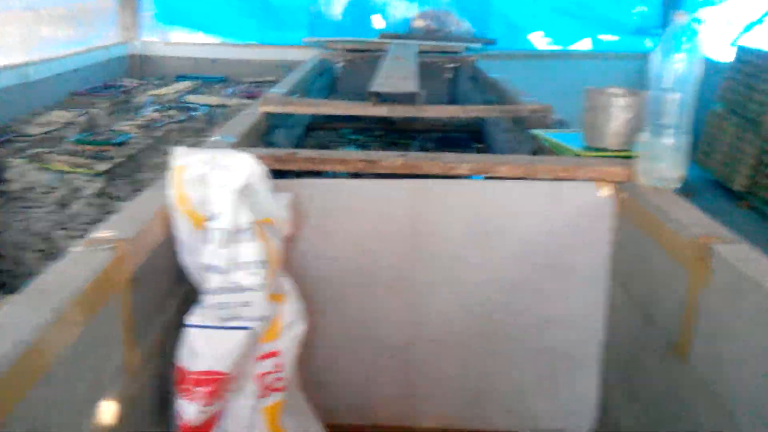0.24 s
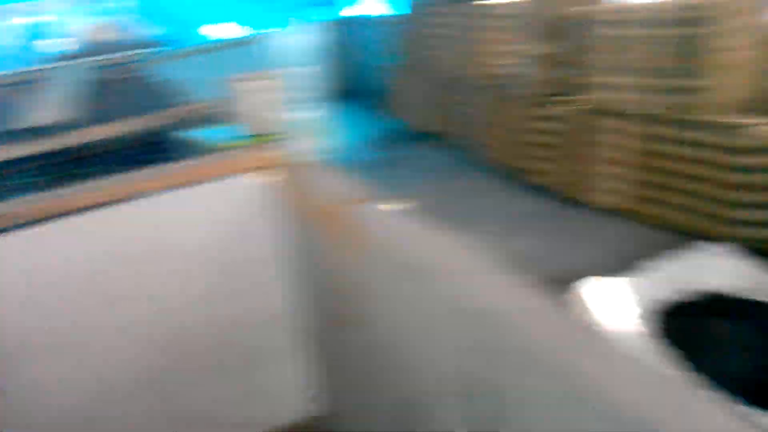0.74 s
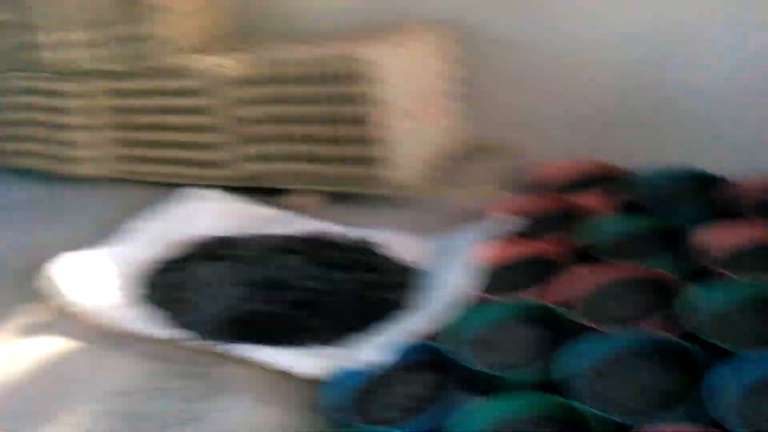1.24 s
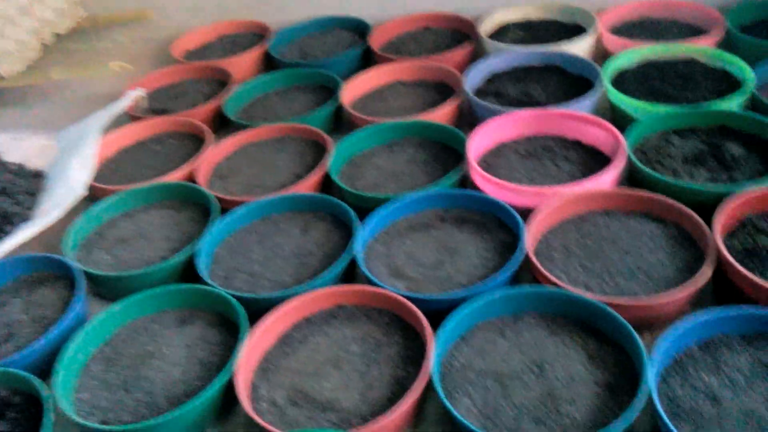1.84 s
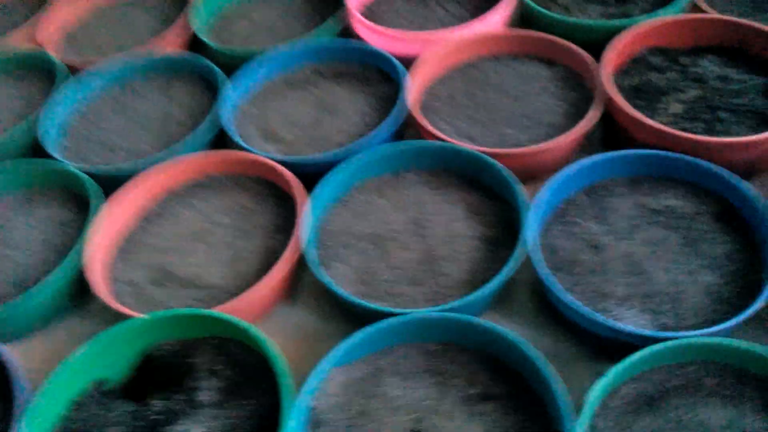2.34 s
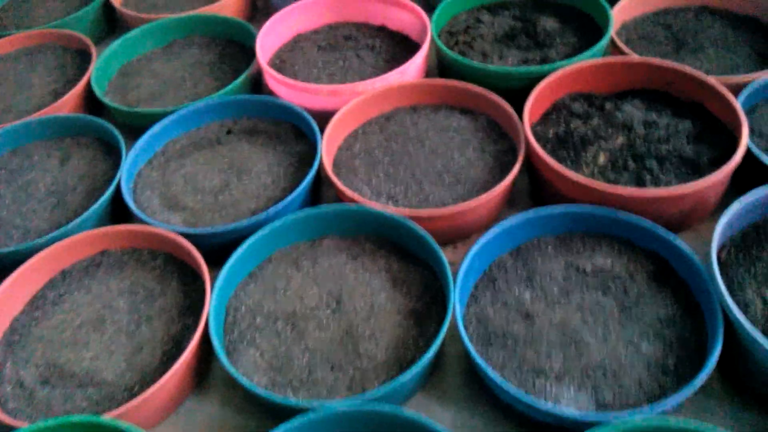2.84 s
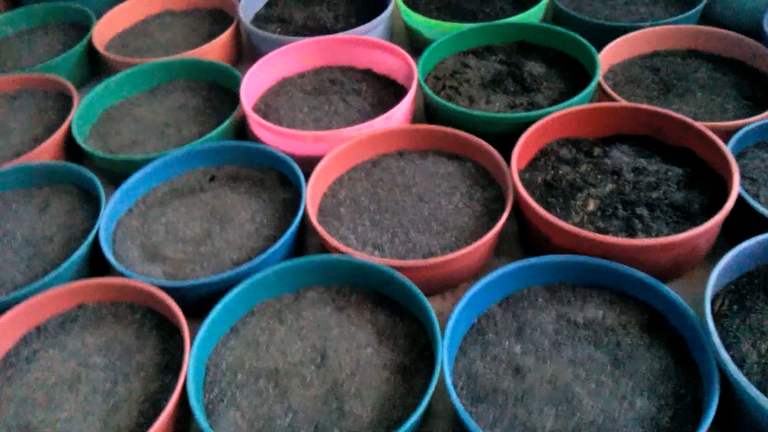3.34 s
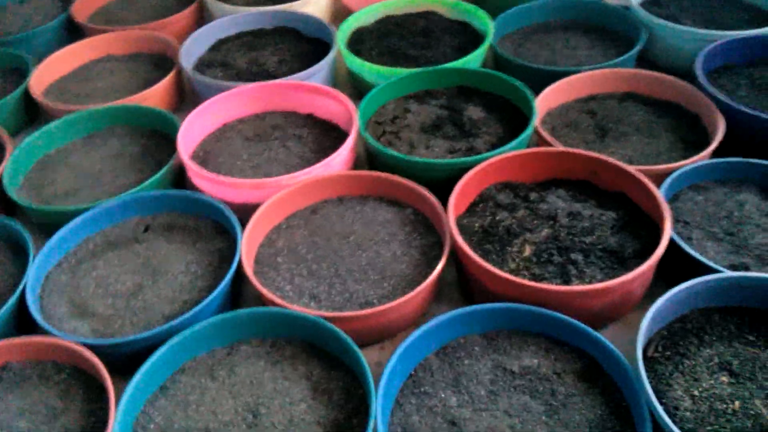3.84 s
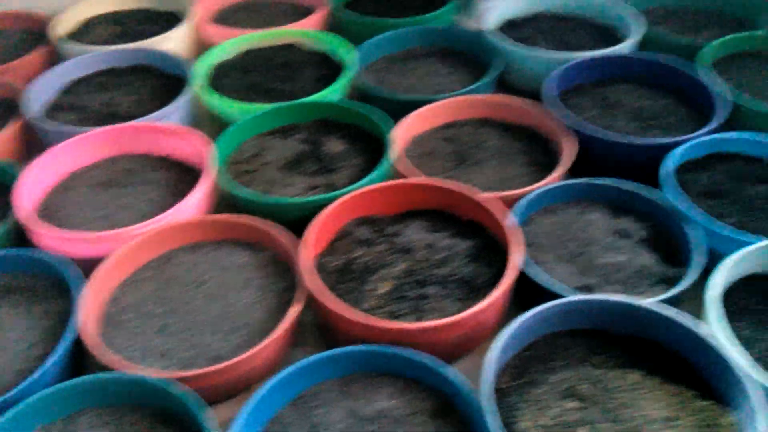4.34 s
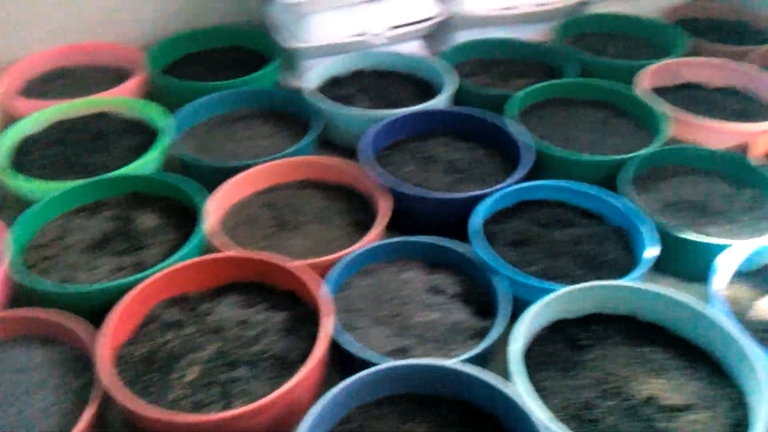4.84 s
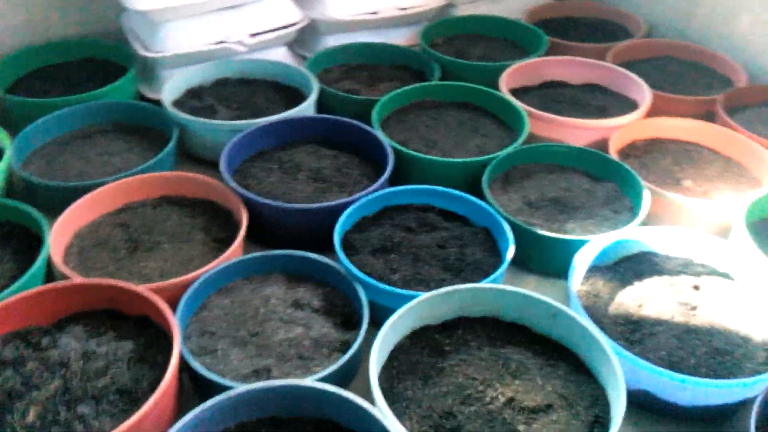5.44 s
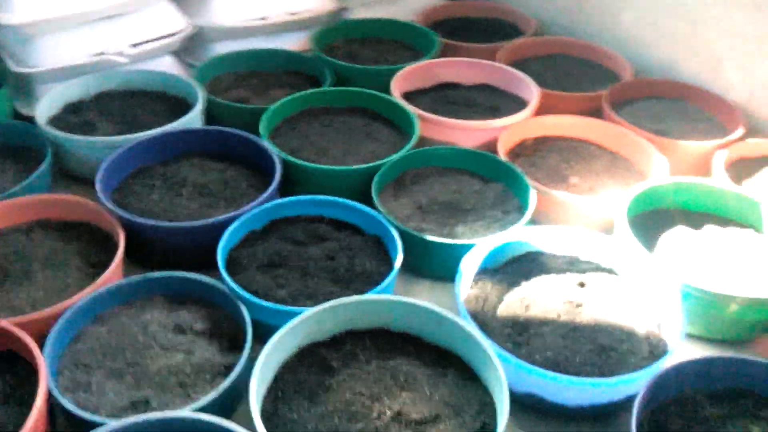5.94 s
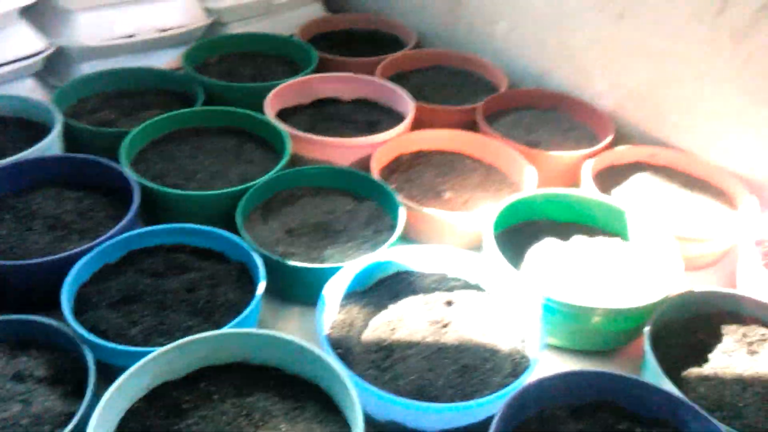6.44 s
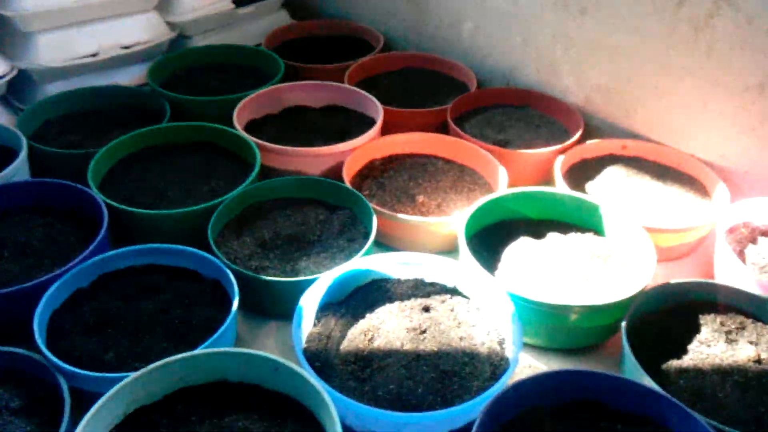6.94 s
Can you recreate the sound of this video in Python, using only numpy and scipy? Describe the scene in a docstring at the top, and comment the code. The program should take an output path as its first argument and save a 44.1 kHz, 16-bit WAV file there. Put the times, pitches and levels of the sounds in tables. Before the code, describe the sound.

Inside a bare-walled farm shed, one close cricket gives clear three-stroke chirps about three and a half times a second. Neighbours chirp unevenly beside it during the first four seconds, and a scratchy colony shimmers behind. A few knocks and rustles come in the first second, later faint rustles and two pairs of tiny squeaks. Soft low rumble and hiss lie beneath. A moving hand-held phone shifts the stereo balance.

```python
"""A farm shed with crickets in rearing pens, heard through a hand-held phone that moves about.
Damped tone pulses make the wing strokes: one near cricket chirps in threes, two neighbours chirp
beside it and a colony shimmers behind; noise-burst echoes from bare walls smear each stroke.
Filtered noise and sine hums lie under it as rumble and air. Noise bursts with ringing modes make
a few knocks, grainy noise makes rustles, and quick falling tones make four faint squeaks."""
import sys
import numpy as np
from scipy import signal
from scipy.fft import rfft, irfft
from scipy.io import wavfile

SR = 44100
rng = np.random.default_rng(int(sys.argv[2]) if len(sys.argv) > 2 else 0)


def store_pcm(level_fs):
    """Save levels as 16-bit WAV."""
    pcm = np.round(np.clip(level_fs, -1, 1) * 32767).astype(np.int16)
    wavfile.write(sys.argv[1], SR, np.atleast_2d(pcm).T)


N = 317520


def undb(db):
    """Decibels to gain."""
    return 10 ** (np.asarray(db) / 20)


def unit(x):
    """Scale to rms 1."""
    return x / np.sqrt(np.mean(x ** 2) + 1e-20)


def pan(db):
    """Left and right gains for a left-minus-right level in dB, at constant total power."""
    return undb(np.array([[db], [-db]]) / 2) / np.sqrt(np.cosh(db * np.log(10) / 20))


def add(out, s, x):
    """Mix x into out from time s on, dropping what falls outside."""
    i = int(round(s * SR))
    a, b = max(i, 0), min(i + x.shape[-1], N)
    if b > a:
        out[:, a:b] += x[..., a - i:b - i]


def shaped(x, gain):
    """Filter x by a gain given as a function of frequency."""
    length = x.shape[-1]
    hz = np.arange(length // 2 + 1) * SR / length + 0.0011  # the offset keeps 0 Hz out of the logs
    return irfft(rfft(x) * gain(hz), length)


def colour(x, points):
    """Filter x by (f/Hz, level/dB) points, joined on a log frequency axis."""
    hz, db = np.transpose(points)
    return shaped(x, lambda f: undb(np.interp(np.log(f), np.log(hz), db)))


def band(length, hz, width):
    """Noise of rms 1 in one steep-sided resonance."""
    noise = rng.standard_normal(length)
    return unit(shaped(noise, lambda f: 1 / np.sqrt(1 + (2 * (f - hz) / width) ** 4)))


def walk(rate):
    """Random drift through `rate` new values a second, with a spread of about 0.6."""
    knots = rng.standard_normal(1000)
    return 0.77 * np.interp(np.arange(N) / SR * rate, np.arange(len(knots)), knots)


def shed(x, t60_s=0.2, early_db=3, early_s=0.0062, gap_s=0.0073):
    """Wall echoes at one spot: early burst, then diffuse tail, unrelated in the two channels."""
    t = np.arange(SR // 2) / SR
    tail = undb(-60 * t / t60_s)
    early = undb(early_db) * np.exp(-t / early_s)
    fade = (tail + early) * np.clip(t / gap_s - .5, 0, 1)
    echoes = rng.standard_normal((2, len(t))) * fade / np.sqrt(np.sum(fade ** 2))
    return signal.fftconvolve(np.atleast_2d(x), echoes, axes=1)


# stereo width of the background: f/Hz, side minus mid level/dB
SIDE_LEVEL = [(60, -23.5), (250, -16), (600, -7.5), (1400, -11), (3000, -6), (12000, 6)]


def background(points, db, pan_db, low_hz, flicker_db=.35):
    """Diffuse noise, alike in both channels in the bass and wide in the treble; its level flickers."""
    mid, side = colour(rng.standard_normal((2, N)), points)
    both = unit(mid) + colour(unit(side), SIDE_LEVEL) * np.array([[1], [-1]])
    both = shaped(both, lambda f: 1 / np.sqrt(1 + (low_hz / f) ** 6))  # bass cut
    return both * pan(pan_db) * undb(db + flicker_db * walk(21))


# spectrum of the low rumble: f/Hz, relative level/dB
RUMBLE_SPECTRUM = [(12, -57), (20, -38), (22, -16), (56, -4.5), (77, 1.5), (112, -6.5), (140, -7.5),
                   (182, -14), (406, -24), (592, -30.5), (1000, -36.5), (1300, -45), (2200, -120)]
# slow rise and fall of the rumble: t/s, added level/dB
RUMBLE_SWELL = [(0, 2), (1.2, 0.5), (2.2, 1), (3.4, 1.5), (4.4, 1), (5.4, 0), (6.2, 1), (7.2, 1.5)]


def rumble():
    """Bass noise that swells slowly."""
    swell = undb(np.interp(np.arange(N) / SR, *np.transpose(RUMBLE_SWELL)))
    return swell * background(RUMBLE_SPECTRUM, db=-44.5, pan_db=.5, low_hz=34)


# spectrum of the air in the shed: f/Hz, relative level/dB
AIR_SPECTRUM = [(700, -17.5), (1200, -3), (2000, -1.5), (3200, 2.5), (4400, -1), (5600, 4), (7000, -13.5),
                (8500, -13), (11000, -6), (15500, -8.5)]


def air():
    """Wide, steady hiss above the rumble."""
    return background(AIR_SPECTRUM, db=-54.5, pan_db=-1, low_hz=700)


# low hums: start t/s, length/s, f/Hz, rms level at the start/dB, fade/(dB per s, negative grows)
HUM_EVENTS = [(-.1, 0.27, 91.4, -39.5, 6), (2.255, 0.63, 74.5, -34.5, 15.5), (2.7, 0.25, 110, -44.5, -4),
              (6.001, .1, 83.9, -36.5, 0), (5.997, 0.102, 104, -37.5, 0), (6.74, 0.46, 109.2, -41.5, -4.5)]


def hums(edge_s=0.051, waver_db=1.0):
    """Low sine tones come and go in the rumble, wavering together in level."""
    t, out = np.arange(N) / SR, 0
    for s, length, hz, db, fade_db in HUM_EVENTS:
        age = np.clip(t - s, 0, length)
        gate = np.clip(np.minimum(age, length - age) / edge_s, 0, 1)
        tone = np.sqrt(2) * np.sin(2 * np.pi * hz * t)
        out = out + gate * undb(db - fade_db * age) * tone
    return out * undb(waver_db * walk(12))


def stroke(hz, octave_db, third_db, rise_s=0.0065, fall_s=0.0041, droop=0.03, jitter=0.037,
           rasp_db=-35, zing_db=-35):
    """One wing closure, peaking 20 ms in: the file drives the wing's resonance; pitch sags as it slows."""
    t = np.arange(SR // 20) / SR - 1 / 50
    swell = np.exp(-(t / np.where(t < 0, rise_s, fall_s)) ** 2)
    sag = droop * np.clip(t / fall_s / 2, 0, 1) ** 2
    pitch = hz * (1 + 0.002 * rng.standard_normal() - sag)
    # uneven teeth shake the phase, which blurs the overtones most, and add a rasp
    phase = 2 * np.pi * (np.cumsum(pitch) / SR + rng.random()) + jitter * band(len(t), 100, 390)
    rasp = undb(rasp_db) * band(len(t), 5000, 2030)
    zing = undb(zing_db) * band(len(t), 15100, 900)
    overtones = undb(octave_db) * np.sin(2 * phase) + undb(third_db) * np.sin(3 * phase)
    return swell * (np.sin(phase) + overtones + rasp + zing)


def colony(count=150, hz=4700, spread_hz=330, spread_db=0.98, db=-52, pan_db=-3):
    """Many distant, scratchy three-stroke chirps, heard only off the walls."""
    out = np.zeros((1, N))
    for k, (late, detune, loud) in enumerate(rng.standard_normal((count, 3))):
        start = (k + late / 2) * N / SR / count
        pitch = hz + spread_hz * detune
        for j in range(3):
            tone = stroke(pitch, octave_db=-38, third_db=-45, jitter=1.36)
            add(out, start + j * 0.028, undb(spread_db * loud) * tone)
    return undb(db) * pan(pan_db) * unit(shed(out)[:, :N])


def scrape(hz, below=0.97, width_hz=340, late_s=0.004, length_s=0.012, db=-9.5, octave_db=-28):
    """Late in a stroke the file slips out of step and scrapes just below the tone and near its octave."""
    t = np.arange(SR // 20) / SR - 1 / 50
    noise = band(len(t), hz * below, width_hz) + undb(octave_db) * band(len(t), 2 * hz, width_hz / 2)
    return undb(db) * np.exp(-((t - late_s) / length_s) ** 2) * noise


def add_stroke(out, s, tone, hz, direct, wet, port_lag_s=.000045):
    """A stroke arrives directly, right port first, and off the walls in a fresh pattern as the phone moves."""
    echoes = shed(tone + scrape(hz))  # the scrape is heard only off the walls
    # give the echoes of each channel the energy of the tone
    echoes = echoes * np.sqrt(np.sum(tone ** 2) / np.sum(echoes ** 2, axis=1, keepdims=True))
    left = shaped(tone, lambda f: np.exp(-2j * np.pi * f * port_lag_s))
    add(out, s - 1 / 50, direct * np.array([left, tone]))
    add(out, s - 1 / 50, wet * echoes)


def add_neighbour_chirp(out, s, strokes, hz, octave_db, gains, spacing_s=.038):
    """A neighbour's chirp: rough, widely spaced strokes, as strong off the walls as direct."""
    for k in range(strokes):
        tone = stroke(hz, octave_db, third_db=-35, rise_s=0.0035, fall_s=0.0052, jitter=0.22)
        add_stroke(out, s + k * spacing_s, tone, hz, gains, gains)


# chirps of the bright rival: first stroke t/s, number of strokes, level/dB
RIVAL_TIMES = [(0, 1, -25.5), (.08, 3, -26.5), (.28, 4, -25), (.64, 3, -25), (1.172, 4, -25.5),
               (1.39, 4, -25.5), (2.01, 5, -31.5), (2.58, 4, -30.5), (2.89, 6, -32.5), (3.32, 4, -32),
               (3.636, 4, -30.5), (3.98, 5, -39.5)]
# brightness of the rival: t/s, octave level under the tone/dB
RIVAL_BRIGHTNESS = [(.5, -20.5), (1.2, -16), (2.1, -13.5)]


def rival_cricket(hz=5000, pan_db=-2.5):
    """A neighbour with a strong octave chirps at uneven gaps, with a varying number of strokes."""
    out = np.zeros((2, N))
    for s, strokes, db in RIVAL_TIMES:
        octave_db = np.interp(s, *np.transpose(RIVAL_BRIGHTNESS))
        add_neighbour_chirp(out, s, strokes, hz, octave_db, undb(db) * pan(pan_db))
    return out


# knocks: t/s, thud level/dB, centre f/Hz, bandwidth/Hz, decay constant/s, ring level against thud/dB
KNOCK_EVENTS = [(.085, -24, 224, 261, 0.0068, -21), (0.489, -39.5, 700, 1100, 0.0027, -16),
                (0.754, -33, 280, 330, 0.0061, -21), (0.806, -31.5, 2200, 4230, 0.0053, 2.5)]
# modes of the knocked thing: f/Hz, relative level/dB, 60 dB decay time/s
RING_MODES = [(488, -0.5, 0.056), (525, -2, 0.021), (617, -6.5, 0.027), (920, -34, 0.018), (1600, -38, .03),
              (1700, 0.5, 0.016), (2560, -4.5, 0.029), (3310, -2, 0.043)]


def knocks(wet_db=-13, attack_s=0.0018):
    """Each contact is a short noise thud or clack plus ringing modes, strongest in the last."""
    out, t = np.zeros((2, N)), np.arange(SR // 4) / SR
    ring = 0
    for hz, db, t60 in RING_MODES:
        ring = ring + undb(db - 60 * t / t60) * np.sin(2 * np.pi * hz * t)
    for s, db, hz, width, decay, ring_db in KNOCK_EVENTS:
        fade = np.exp(-t / decay) * (1 - np.exp(-t / attack_s))
        thud = unit(band(len(t), hz, width) * fade) * np.sqrt(np.mean(fade ** 2))
        blow = undb(db) * (thud + undb(ring_db) * ring)
        add(out, s, blow)
        add(out, s, undb(wet_db) * shed(blow))
    return out


# rustles: peak t/s, length/s, body centre f/Hz, body level/dB, hiss level/dB
RUSTLE_EVENTS = [(0.165, 0.032, 2300, -47.5, -49), (0.232, 0.034, 2280, -50.5, -51),
                 (0.351, 0.13, 3080, -55.5, -60), (0.735, 0.098, 3200, -55, -49),
                 (0.801, 0.018, 3440, -36.5, -41), (1.299, 0.18, 3220, -59.5, -59.5),
                 (1.703, .13, 3340, -53, -68), (2.151, 0.14, 3120, -57, -58.5),
                 (3.855, 0.045, 2230, -54, -69.5), (4.329, 0.052, 2960, -51, -59)]


def rustles(pan_db=3, wet_db=-5, width_hz=1300, usual_s=.05, broadening=0.4,
            hiss_hz=12800, hiss_width_hz=5500):
    """Swells of grainy friction noise: a resonant body, broader the quicker the rub, and a high hiss."""
    out, t = np.zeros((2, N)), np.arange(SR // 2) / SR - 1 / 4
    for s, length, hz, body_db, hiss_db in RUSTLE_EVENTS:
        body = band(len(t), hz, width_hz * (usual_s / length) ** broadening)
        hiss = band(len(t), hiss_hz, hiss_width_hz)
        noise = undb(body_db) * body + undb(hiss_db) * hiss
        grains = unit(undb(2.5 * band(len(t), 51, 300)))
        swell = noise * grains * np.exp(-2 * (t / length) ** 2)
        add(out, s - 1 / 4, pan(pan_db) * swell)
        add(out, s - 1 / 4, undb(wet_db) * pan(pan_db) * shed(swell))
    return out


# chirps of the near cricket: peak of first stroke t/s, level before the gains below/dB
NEAR_CHIRPS = [(.176, -21.5), (.415, -22), (.664, -21), (.973, -22.5), (1.335, -27.5), (1.668, -25.5),
               (1.972, -22), (2.260, -23), (2.532, -22.5), (2.821, -25), (3.098, -24), (3.408, -24.5),
               (3.702, -24), (3.972, -22.5), (4.312, -25.5), (4.568, -25), (4.862, -23.5), (5.149, -24),
               (5.439, -25.5), (5.733, -25.5), (6.044, -24.5), (6.331, -23), (6.592, -21.5), (6.878, -24.5),
               (7.152, -24.5)]
# the three wing strokes of its chirp: place/stroke spacings, added level/dB, f/Hz
WING_STROKES = [(0, 1, 5082), (.95, 2, 5092), (2, 2, 5101)]
# its direct sound as the phone turns: t/s, added level/dB, left minus right level/dB
PHONE_FACING = [(.176, -4, -14), (.66, -3.5, -8), (.97, 1, -10), (1.33, 1, 1), (1.67, -2, 6),
                (1.97, -5, -8), (2.26, .5, -7.5), (3.41, 5, -12), (4.57, 0, -3), (4.86, -4, -10),
                (5.44, 0, -4), (5.73, 1, -11), (6.05, -3.5, -12), (6.59, -5, -24), (6.88, 2.5, -11.5)]


def near_cricket(gain_db=5.0, wet_db=-3, wall_pan_db=-5, spacing_s=.0333):
    """Three strokes to a chirp, about three and a half chirps a second; the phone turns around it."""
    out = np.zeros((2, N))
    times, directs, pans = np.transpose(PHONE_FACING)
    for s, db in NEAR_CHIRPS:
        direct = undb(np.interp(s, times, directs)) * pan(np.interp(s, times, pans))
        wet = undb(wet_db) * pan(wall_pan_db)
        for place, stroke_db, hz in WING_STROKES:
            size = undb(gain_db + db + stroke_db)
            tone = stroke(hz, octave_db=-33, third_db=-35.5)
            add_stroke(out, s + place * spacing_s, tone, hz, size * direct, size * wet)
    return out


# bouts of the low cricket: start t/s, chirps, strokes in each, f/Hz, level at the start/dB,
# fade/(dB per s, negative grows)
LOW_BOUTS = [(.205, 3, 2, 4880, -27.5, -9.5), (1.076, 7, 2, 4830, -27.5, 4.5),
             (4.259, 2, 2, 4710, -34.5, 38), (5.951, 4, 3, 4815, -27.5, 11.5)]


def low_cricket(period_s=.283, octave_db=-34, pan_db=-6, wander=0.0089):
    """A lower neighbour chirps evenly in bouts, its pitch wandering from chirp to chirp."""
    out = np.zeros((2, N))
    for s, chirps, strokes, hz, db, fade_db in LOW_BOUTS:
        for age in period_s * np.arange(chirps):
            pitch = hz * (1 + wander * rng.standard_normal())
            gains = undb(db - fade_db * age) * pan(pan_db)
            add_neighbour_chirp(out, s + age, strokes, pitch, octave_db, gains)
    return out


# squeaks: peak t/s, time from peak to 1/e/s, middle f/Hz, fall/(Hz per s), level/dB
SQUEAK_EVENTS = [(4.698, 0.0076, 4020, 70000, -44), (4.748, 0.01, 3970, 69600, -37.5),
                 (5.682, 0.0094, 4050, 75000, -40), (5.723, 0.0095, 4000, 80000, -38)]


def squeaks(wet_db=-5, roughness=0.64, bounce_s=0.014, bounce_db=-7):
    """Faint rough tones that fall quickly, in two pairs, each doubled by a near wall."""
    out, t = np.zeros((2, N)), np.arange(SR // 10) / SR - 1 / 20
    for s, length, hz, fall, db in SQUEAK_EVENTS:
        phase = 2 * np.pi * (hz * t - fall * t ** 2 / 2) + roughness * band(len(t), 220, 400)
        tone = undb(db) * np.exp(-(t / length) ** 2) * np.sin(phase)
        add(out, s - 1 / 20, tone)
        add(out, s - 1 / 20 + bounce_s, undb(bounce_db) * tone)
        add(out, s - 1 / 20, undb(wet_db) * shed(tone))
    return out


def scene():
    """Crickets over the small noises and the background of the shed."""
    shed_bed = rumble() + air() + hums()
    crickets = colony() + rival_cricket() + near_cricket() + low_cricket()
    return shed_bed + crickets + knocks() + rustles() + squeaks()


def record(dry, left_top_db=2, right_top_db=-3, top_hz=15800):
    """The left port is brighter than the right above 7 kHz; the phone cuts the top steeply."""
    left = colour(dry[0], [(7000, 0.0076), (10000, left_top_db)])
    right = colour(dry[1], [(7000, 0.0076), (10000, right_top_db)])
    top_cut = signal.ellip(10, .2, 80, top_hz, fs=SR, output="sos")
    return signal.sosfilt(top_cut, np.array([left, right]))


dry = scene()
out = record(dry)
store_pcm(out)
```